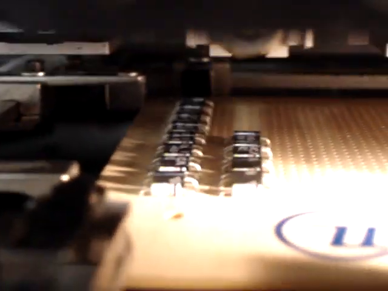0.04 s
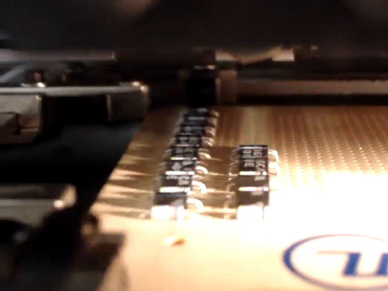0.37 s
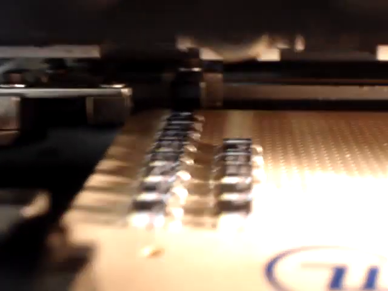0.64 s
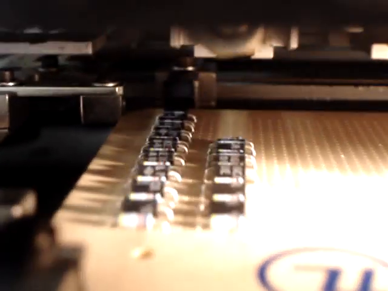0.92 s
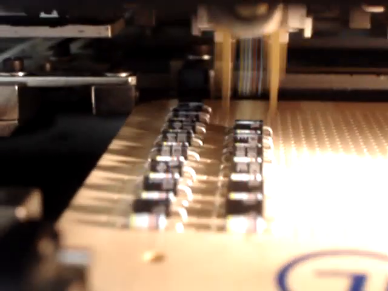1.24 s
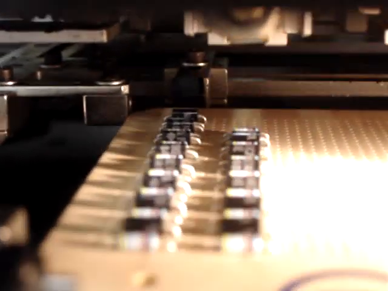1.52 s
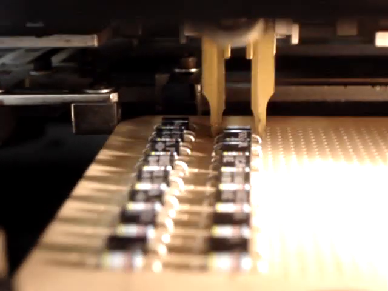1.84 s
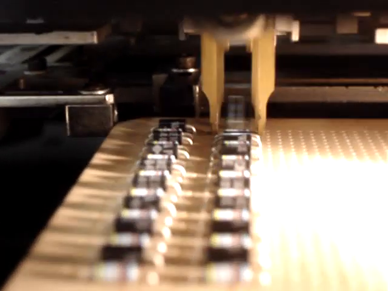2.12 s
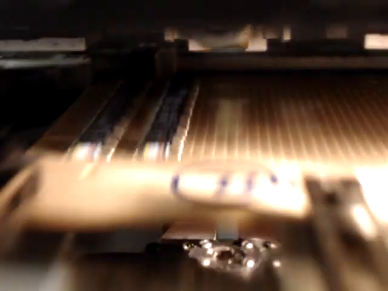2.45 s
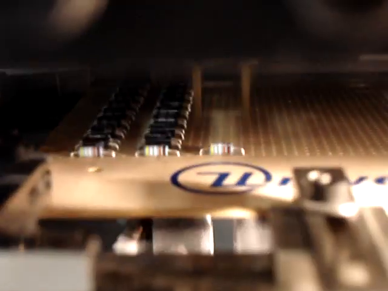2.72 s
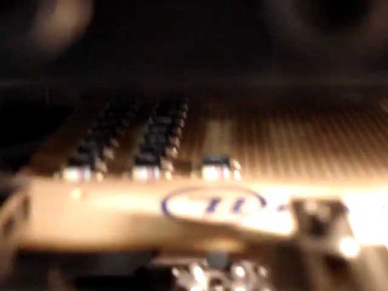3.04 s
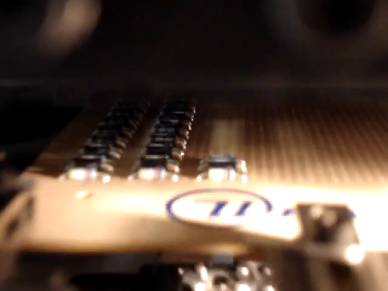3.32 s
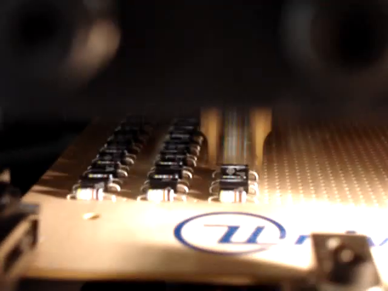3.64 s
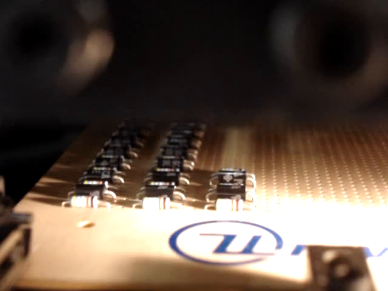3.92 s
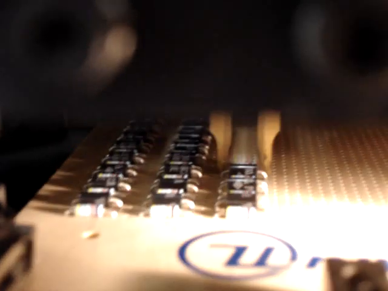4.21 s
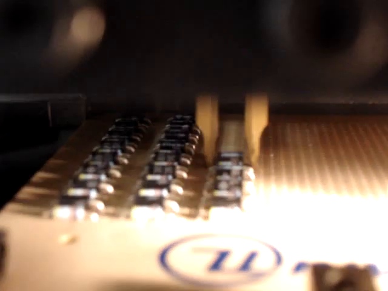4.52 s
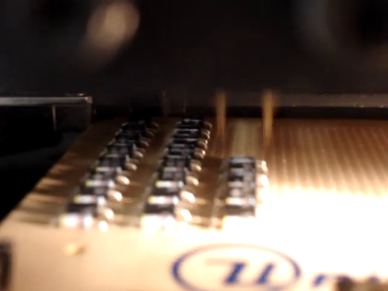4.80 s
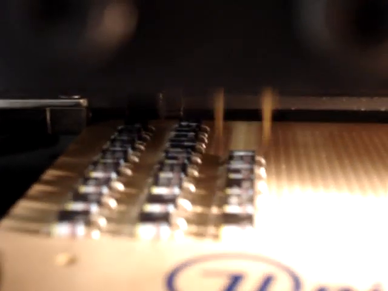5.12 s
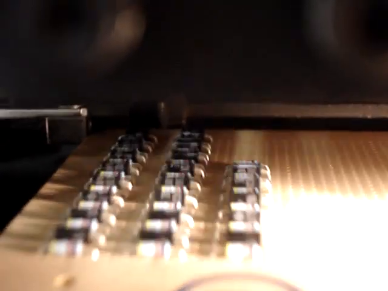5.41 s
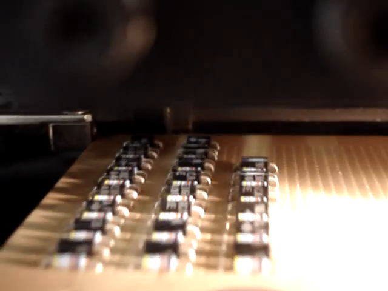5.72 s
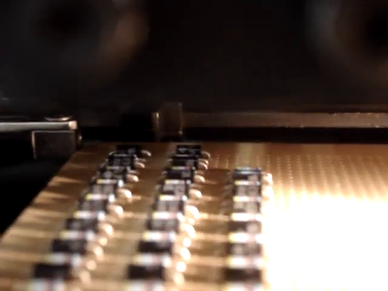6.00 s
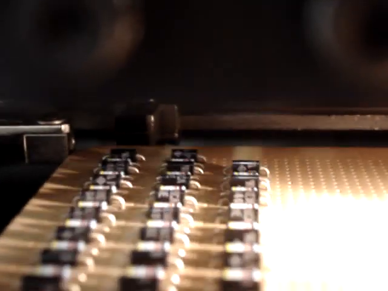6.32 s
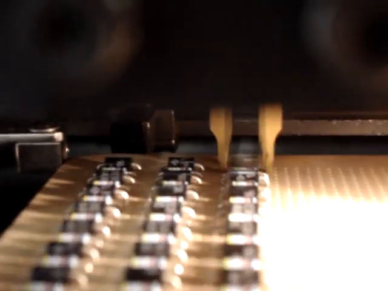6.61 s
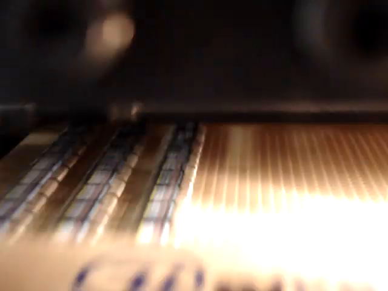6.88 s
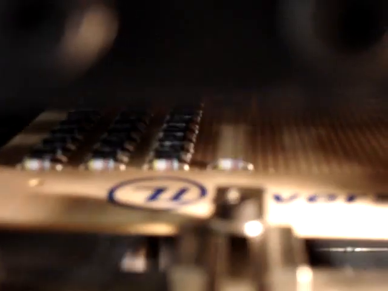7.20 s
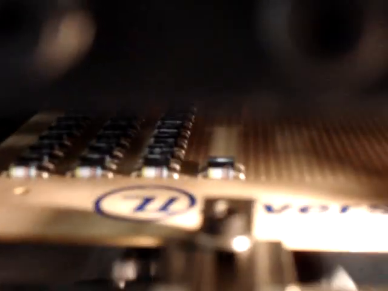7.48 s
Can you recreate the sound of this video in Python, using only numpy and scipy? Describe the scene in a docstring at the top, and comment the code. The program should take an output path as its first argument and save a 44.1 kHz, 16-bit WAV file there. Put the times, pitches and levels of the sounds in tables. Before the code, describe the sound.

Close by, a machine drives small parts into a circuit board at nearly four strokes a second. Each stroke is a sharp steel clack followed by a quick rattle of clicks and a small thud, harder and softer blows mostly alternating. Twice the rhythm breaks for an instant with a knock and a short whirr as the table shifts, then resumes. Motor hum and a workshop rush continue underneath.

```python
"""A component insertion machine, close by, sets rows of sixteen parts into a circuit board, one per cam turn.
Each turn the ram strikes, mostly hard and soft in alternation; the leads scrape home, the part seats,
the clinch anvil thuds, the head rattles back to its stop, the board table steps on and the feed draws
in the next part. The sound shifts along the row. After a row the head idles for one turn while the
table travels. Throughout, loose parts tick, the motor hums and the workshop rushes underneath."""
import sys
import numpy as np
from scipy import signal
from scipy.fft import rfft, irfft, next_fast_len
from scipy.io import wavfile
from scipy.ndimage import uniform_filter1d

SR = 44100
rng = np.random.default_rng(int(sys.argv[2]) if len(sys.argv) > 2 else 0)


def to_wav(sig):
    """Store sig (one row per channel, or 1-D mono) as 16-bit WAV at the path in sys.argv[1].

    Samples outside -1..1 are clipped; the rate is SR.
    """
    pcm = np.clip(np.atleast_2d(sig), -1, 1) * 32767
    pcm = np.round(pcm).astype(np.int16)
    wavfile.write(sys.argv[1], SR, pcm.T)  # frames by channels


N = 332955
TIME = np.arange(N) / SR
TURN_S, PARTS_PER_ROW = .26778, 16
TOP_HZ, TINT_DB = 10100, 3.6


# Ram blows, force relative to an ordinary one: start_s, force_db
RAM_BLOWS = [(-.005, 0), (.2623, -2.7), (.5285, .4), (.7984, -1.1), (1.0648, .7), (1.3373, -1.4),
             (1.6006, 1.5), (1.8744, -.4), (2.1364, 2.8), (2.6522, -1.1), (2.9182, 1.5), (3.1894, -1.8),
             (3.4533, 1.4), (3.7233, -2.1), (3.99, -.6), (4.2597, -3.1), (4.5248, 1.5), (4.7949, -1.1),
             (5.0581, 3.7), (5.3313, -1), (5.5932, 2.5), (5.8667, -1.4), (6.1323, 1.4), (6.4037, .7),
             (6.6702, .4), (7.1836, -.4), (7.452, 1.5)]
# Contacts per blow: delay_s, level_db, t60_s, rise_s
RAM_HITS = [(-.0085, -26.5, .03, .002), (-.002, -14, .017, .001), (.002, -20.5, .016, .0007),
            (.0075, -24, .022, .0007)]
# Ram spectrum: freq_hz, level_db
RAM_EQ = [(100, -10.5), (250, -7.5), (500, -11), (1100, -9.5), (2200, -9), (2700, -0.5), (3600, -4.5),
          (5800, 1), (6600, -5), (8500, -2), (10000, -8)]
# Ram resonances: centre_hz, width_hz, lift_db
RAM_PEAKS = [(302, 35, 4.5), (790, 150, 8), (1800, 530, 7), (3520, 250, 3)]

def ram(force_share):
    """The ram strikes in a quick cluster of steel contacts."""
    start_s, force_db = np.transpose(RAM_BLOWS)
    blows = cam(start_s, force_share * force_db, RAM_HITS, alike=.25, jitter_s=.0003,
                ringing=.6, judder_db=2.5, tint_db=TINT_DB)
    return body(blows, RAM_EQ, RAM_PEAKS)


# Ram mode: delay_s, pitch_hz, level_db, t60_s, rise_s, db_per_force_db
PING_MODE = (-.0018, 4320, -14.5, .022, .0012, 1.7)

def ping(detune):
    """A square blow rings the ram with one clear note, which grows faster than the force."""
    delay, hz, db, t60, rise, growth = PING_MODE
    t, track = TIME[:SR // 10], np.zeros(N)
    for s, force_db in RAM_BLOWS:
        pitch_hz = hz * (1 + detune * rng.uniform(-1, 1))
        add(track, s + delay, ring(t, pitch_hz, db + growth * force_db, t60, rise))
    return track


# Spring contacts: delay_s, level_db, t60_s, rise_s
SPRING_HITS = [(-.004, -32.5, .035, .002), (.001, -26, .028, .0012)]
# Row trend: level_db, slope_db, force_share, first_db, lag_s
SPRING_TREND = (-1.3, 5, -.1, 4.5, .0003)
# Spring spectrum: freq_hz, level_db
SPRING_EQ = [(1000, -44.5), (1550, -21), (1700, 1.5), (1880, 4), (2150, -22), (3500, -29)]

def spring():
    """The blow jars the ram's spring, which sounds in one narrow band."""
    hits = cam(*played(SPRING_TREND), SPRING_HITS, alike=.86, jitter_s=.00037, scatter_db=2)
    return body(hits, SPRING_EQ)


# Lead contacts: delay_s, level_db, t60_s, rise_s
SCRAPE_HITS = [(.0165, -27, .032, .001), (.022, -26.5, .026, .0007), (.0275, -27, .024, .0007)]
# Row trend: level_db, slope_db, force_share, first_db, lag_s
SCRAPE_TREND = (.5, 0, .8, -4, .0003)
# Scrape spectrum, also the linkage's: freq_hz, level_db
SCRAPE_EQ = [(100, -14), (250, -4), (1100, -4), (2700, -3.5), (3600, 0), (5800, -2.5), (6600, -8),
             (8500, -4), (10000, -13)]
# Scrape resonances: centre_hz, width_hz, lift_db
SCRAPE_PEAKS = [(1750, 500, 4), (4900, 300, 2.5)]

def scrape():
    """The leads scrape through the holes."""
    hits = cam(*played(SCRAPE_TREND), SCRAPE_HITS, alike=.36, jitter_s=.0014, scatter_db=1.5,
               ringing=.78, judder_db=3, tint_db=TINT_DB)
    return body(hits, SCRAPE_EQ, SCRAPE_PEAKS)


# Seating contact: delay_s, level_db, t60_s, rise_s
TAP_HITS = [(.0449, -18.4, .021, .0008)]
# Row trend: level_db, slope_db, force_share, first_db, lag_s
TAP_TREND = (-.6, 1.5, .55, 2, .002)
# Tap spectrum, also the empty head's: freq_hz, level_db
TAP_EQ = [(100, -35), (250, -3.5), (500, -9), (1100, -7), (2200, -6), (2700, -1.5), (3600, -1), (5800, 3.5),
          (6600, -1.5), (8500, -2), (10000, -10.5)]
# Tap resonances: centre_hz, width_hz, lift_db
TAP_PEAKS = [(1900, 400, 7), (2600, 600, 5), (4500, 600, 6), (7700, 500, 5)]

def tap():
    """The part seats on the board."""
    hits = cam(*played(TAP_TREND), TAP_HITS, alike=.5, jitter_s=.0003, judder_db=3, tint_db=TINT_DB)
    return body(hits, TAP_EQ, TAP_PEAKS)


# Thud, then bounces: delay_s, level_db, t60_s, rise_s
ANVIL_HITS = [(.064, -20.3, .023, .002), (.077, -27.5, .024, .0015), (.085, -29.5, .016, .001),
              (.096, -29, .016, .003)]
# Row trend: level_db, slope_db, force_share, first_db, lag_s
ANVIL_TREND = (0, .6, .3, 3.5, .0005)
# Anvil spectrum: freq_hz, level_db
ANVIL_EQ = [(100, -17), (200, -22), (400, -4), (750, -8.5), (1100, -17), (1900, -12), (3100, -18),
            (3700, -14), (4800, -18), (6000, -13), (10000, -20)]
# Anvil resonances: centre_hz, width_hz, lift_db
ANVIL_PEAKS = [(260, 54, 9), (470, 64, 5), (790, 70, 6), (932, 90, 14.5)]

def anvil(soft_hz):
    """The clinch under the board folds the leads with a thud; its bounces are duller."""
    s, db = played(ANVIL_TREND)
    thud = cam(s, db, ANVIL_HITS[:1], alike=1, jitter_s=.0001)
    bounces = cam(s, db, ANVIL_HITS[1:], alike=1, jitter_s=.0001)
    dull = signal.sosfilt(signal.butter(1, soft_hz, fs=SR, output="sos"), bounces)
    return body(thud + dull, ANVIL_EQ, ANVIL_PEAKS)


# Catch and bounce contacts: delay_s, level_db, t60_s, rise_s
CATCH_HITS = [(-.009, -29, .025, .0006), (0, -25, .025, .0006)]
RETURN_HITS = [(.119, -25, 0.03, 0.0004), (.1235, -24, 0.021, 0.0004), (.128, -26, 0.03, 0.0008)]
# Row trends: level_db, slope_db, force_share, first_db, lag_s
CATCH_TREND = (2.5, -1.5, .1, -8, -.008)
RETURN_TREND = (.9, 2.2, .35, 1.5, .0003)
# Head spectrum: freq_hz, level_db
RETURN_EQ = [(100, -14.5), (250, -17.5), (500, -9.5), (1100, -7), (2200, -7.5), (2700, -19), (3600, -6),
             (5800, 1), (6600, -5), (8500, -5.5), (10000, -10.5)]
# Head resonances: centre_hz, width_hz, lift_db
RETURN_PEAKS = [(732, 134, 4.1), (2767, 710, 16.8)]

def head_return():
    """The head catches and rattles back."""
    s, db = played(CATCH_TREND)
    catch_delay_s = strokes()[-1]
    catch = cam(s + catch_delay_s, db, CATCH_HITS, alike=.34, jitter_s=.0008, scatter_db=1.5,
                ringing=1, judder_db=3.5, tint_db=TINT_DB)
    bounces = cam(*played(RETURN_TREND), RETURN_HITS, alike=.5, jitter_s=.0009, scatter_db=1.5,
                  ringing=.7, judder_db=3, tint_db=TINT_DB)
    return body(catch + bounces, RETURN_EQ, RETURN_PEAKS)


# Hardest clacks of the returning head: start_s, level_db, pitch_hz
HEAD_CLACKS = [(0.1036, -16.3, 6000), (0.1117, -18.3, 5760), (0.3701, -17.3, 3570), (0.3782, -18.5, 3500),
               (0.6448, -16.8, 6180), (0.9036, -17.4, 3700), (0.9147, -16.1, 5080), (1.1782, -16.7, 5920),
               (1.1838, -17.6, 2700), (1.4453, -16.3, 5960), (1.452, -17.4, 4340), (1.704, -16.6, 5480),
               (1.7192, -16.8, 4240), (1.9791, -16.7, 6260), (1.989, -19.6, 5100), (2.2452, -17.5, 5400),
               (2.256, -16.0, 5180), (2.771, -14.8, 4350), (3.0286, -15.8, 6200), (3.0373, -19.1, 4830),
               (3.2957, -14.7, 5730), (3.3057, -17.5, 2910), (3.5627, -16.7, 5490), (3.8289, -14.9, 5770),
               (3.8388, -18.4, 4330), (4.096, -14.3, 5720), (4.3713, -16.2, 5970), (4.3763, -18.0, 5700),
               (4.6373, -17.7, 5440), (4.8965, -17.9, 3740), (4.9108, -17.5, 5880), (5.1714, -15.5, 5920),
               (5.178, -17.5, 3310), (5.4377, -15.3, 6130), (5.4457, -15.6, 4360), (5.7049, -17.1, 5040),
               (5.7124, -17.4, 4380), (5.9708, -16.2, 5660), (5.981, -16.4, 4410), (6.2381, -17.8, 5850),
               (6.2513, -18.4, 4410), (6.5047, -17.2, 3730), (6.5196, -17.5, 4450), (6.7803, -17.9, 6070),
               (6.7905, -18.4, 5190), (7.3015, -14.8, 4280)]

def clacks(crack_db, crack_t60_s, ring_db, ring_t60_s):
    """Steel meets steel as the head swings back: a sharp crack and a brief ring."""
    cracks, rings, t = np.zeros(N), np.zeros(N), TIME[:SR // 10]
    for s, db, hz in HEAD_CLACKS:
        add(cracks, s, amp(db + crack_db) * tinted(chatter(crack_t60_s), TINT_DB))
        add(rings, s, ring(t, hz, db + ring_db, ring_t60_s, rise_s=.0006))
    return body(cracks, RETURN_EQ, RETURN_PEAKS) + rings


# Tick contacts: delay_s, level_db, t60_s, rise_s
TICK_HITS = [(.131, -33, .04, .002), (.1464, -24, .022, .0008)]
# Row trend: level_db, slope_db, force_share, first_db, lag_s
TICK_TREND = (-.3, 2.4, -.5, 3, .001)
# Tick spectrum: freq_hz, level_db
TICK_EQ = [(100, -11), (250, -8), (1100, 1), (2700, -2), (3600, -1), (5800, -8), (10000, -12)]
# Tick resonances: centre_hz, width_hz, lift_db
TICK_PEAKS = [(4400, 1400, 12), (6700, 420, 12)]

def head_tick():
    """The head ticks just before its stop."""
    hits = cam(*played(TICK_TREND), TICK_HITS, alike=.45, jitter_s=.0006, scatter_db=1.2,
               tint_db=TINT_DB)
    return body(hits, TICK_EQ, TICK_PEAKS)


# Stop contacts: delay_s, level_db, t60_s, rise_s
STOP_HITS = [(.154, -21.5, .018, .0012), (.1586, -13.6, .019, .0011)]
# Row trend: level_db, slope_db, force_share, first_db, lag_s
STOP_TREND = (-.1, 2.4, .5, 1, .001)
# Stop spectrum: freq_hz, level_db
STOP_EQ = [(100, -33), (250, 0), (500, -22), (1000, -3), (1400, -11), (2200, -14), (2700, 3.5),
           (3600, -1.5), (5800, 6), (6600, 2), (8500, 2.5), (10000, -4)]
# Stop resonances: centre_hz, width_hz, lift_db
STOP_PEAKS = [(1690, 153, 4), (1800, 640, 26.3), (4350, 590, 10)]

def head_stop():
    """The head hits its sprung stop."""
    hits = cam(*played(STOP_TREND), STOP_HITS, alike=.6, jitter_s=.0005, scatter_db=.8)
    return body(hits, STOP_EQ, STOP_PEAKS)


# Feed contact: delay_s, level_db, t60_s, rise_s
FEED_HITS = [(0.234, -33, 0.036, 0.003)]
# Row trend: level_db, slope_db, force_share, first_db, lag_s
FEED_TREND = (-1.3, -2.5, .5, -3, 0)
# Feed spectrum: freq_hz, level_db
FEED_EQ = [(100, 8.5), (450, -0.5), (1200, -40), (2300, -36.5), (3700, -1), (6500, 6), (9000, 1),
           (10000, -29)]

def feed():
    """The feed draws in the next part."""
    hits = cam(*played(FEED_TREND), FEED_HITS, alike=.15, jitter_s=.002, scatter_db=3.5,
               judder_db=3, tint_db=TINT_DB)
    return body(hits, FEED_EQ)


# Table step contacts: delay_s, level_db, t60_s, rise_s
STEP_HITS = [(.184, -26, .04, .003), (.196, -31, .055, .003), (.203, -30, .05, .003),
             (.218, -34, .035, .003)]
# Table spectrum: freq_hz, level_db
STEP_EQ = [(100, -16), (200, -20.5), (380, -3), (700, -7.5), (1200, -27), (2200, -25), (4000, -21),
           (10000, -31)]
# Table resonances: centre_hz, width_hz, lift_db
STEP_PEAKS = [(261, 44, 8), (440, 14, 3.4), (477, 12, 4), (945, 86, 14), (1553, 48, 9)]
# Table modes: pitch_hz, mid_row_db, t60_s, slope_db
STEP_MODES = [(376, -45, .2, 23), (435, -44, .22, 4), (484, -43, .22, -13), (935, -40.5, .085, -20)]
# Kicks to the modes, anvil then step: delay_s, level_db, rise_s
MODE_KICKS = [(.066, -1, .002), (.186, 0.5, .012)]

def table_step(scatter_db, detune, slope_db):
    """The table shudders one step on; its place along the row decides which modes ring most."""
    s, places = strokes()[:2]
    hits = cam(s, slope_db * places, STEP_HITS, alike=.7, jitter_s=.0005, scatter_db=.8)
    track = body(hits, STEP_EQ, STEP_PEAKS)
    t = TIME[:SR // 5]
    hz, db, t60, mode_slope_db = np.transpose(STEP_MODES)[:, :, None]
    for start, place in zip(s, places):
        for delay, kick_db, rise in MODE_KICKS:
            strength, stray = rng.uniform(-1, 1, (2, *hz.shape))
            mode_db = db + kick_db + mode_slope_db * place + scatter_db * strength
            modes = ring(t, hz * (1 + detune * stray), mode_db, t60, rise)
            add(track, start + delay, modes.sum(axis=0))
    return track


# Idle turns: start_s
IDLE_STARTS = [2.4255, 6.952]
# Clutch knocks and empty-head clicks: delay_s, level_db, t60_s, rise_s
CLUTCH_HITS = [(-.0045, -35, .08, .0004), (0.0002, -22, .052, .0006), (.007, -20, .015, .0004),
               (.226, -18, .014, .0004)]
IDLE_HITS = [(-.053, -34, .06, .002), (.0853, -24, .03, .0004), (.0952, -14.5, .019, .0004),
             (.1065, -26, .035, .0004), (.1163, -26, .017, .0004), (.208, -29, .035, .0008)]
# Clutch spectrum: freq_hz, level_db
CLUTCH_EQ = [(100, -15.5), (240, -6.5), (500, -2.5), (1400, -5), (2200, -7.5), (4000, -5.5), (6000, -5),
             (10000, -12.5)]
# Empty-head resonance: centre_hz, width_hz, lift_db
IDLE_PEAKS = [(3750, 400, 9)]

def idle_head():
    """The clutch drops out with a knock, the empty head clicks and the clutch takes hold again."""
    even_db = np.zeros(len(IDLE_STARTS))
    knocks = cam(IDLE_STARTS, even_db, CLUTCH_HITS, alike=.4, jitter_s=.0003)
    clicks = cam(IDLE_STARTS, even_db, IDLE_HITS, alike=.4, jitter_s=.0003)
    return body(knocks, CLUTCH_EQ) + body(clicks, TAP_EQ, IDLE_PEAKS)


# Drive whine, level relative to the whirr: start_hz, end_hz, level_db
DRIVE_WHINE = (950, 1750, -15)
# Carriage spectrum: freq_hz, level_db
TRAVEL_EQ = [(120, -26.5), (240, 2), (700, 0), (1250, -.5), (1700, -4), (2300, -11.5), (4000, -11),
             (10000, -22)]
# Carriage resonances: centre_hz, width_hz, lift_db
TRAVEL_PEAKS = [(710, 60, 9), (1135, 70, 8), (1540, 150, 6.5)]

def travel(level_db, waver_hz, lead_s=.1, attack_s=.05, hold_s=.21, release_s=.06):
    """The table whirrs to the next row; its drive whines upward through the carriage's resonances."""
    corners_s = np.cumsum([-lead_s, attack_s, hold_s, release_s])
    start_hz, end_hz, whine_db = DRIVE_WHINE
    waver = waver_hz * wobble(N, smooth=200)
    drive = np.zeros(N)
    for s in IDLE_STARTS:
        hz = np.interp(TIME - s, corners_s[[0, -1]], [start_hz, end_hz]) + waver
        whine = amp(whine_db) * np.sin(2 * np.pi * np.cumsum(hz) / SR)
        drive += np.interp(TIME - s, corners_s, [0, 1, 1, 0]) * (rng.standard_normal(N) + whine)
    return amp(level_db) * body(drive, TRAVEL_EQ, TRAVEL_PEAKS)


def boom(pitch_hz):
    """The frame's low mode booms at the clutch's knock and again as the table brakes."""
    t, track = TIME[:SR // 3], np.zeros(N)
    for s in IDLE_STARTS:
        add(track, s, ring(t, pitch_hz, level_db=-34, t60_s=.12, rise_s=.003))
        add(track, s + .14, ring(t, pitch_hz, level_db=-35, t60_s=.25, rise_s=.025))
    return track


# Squeaks of the parts tape: centre_s, level_db, pitch_hz
TAPE_SQUEAKS = [(.771, -39, 4970), (5.303, -32, 5060), (6.371, -38, 5060), (6.915, -37, 5180)]

def squeaks(width_s, waver_hz):
    """The tape sticks and slips in its guide: a short wavering tone."""
    t, track = TIME[:SR // 10], np.zeros(N)
    swell = np.exp(-((t - t.mean()) / width_s) ** 2)
    for s, db, hz in TAPE_SQUEAKS:
        pitch_hz = hz + waver_hz * wobble(len(t), smooth=60)
        add(track, s - t.mean(), amp(db) * swell * np.sin(2 * np.pi * np.cumsum(pitch_hz) / SR))
    return track


# Link contacts: delay_s, level_db, t60_s, rise_s
LINK_HITS = [(.074, -38.5, .06, .002), (.137, -39, .05, .002), (.195, -38.5, .05, .002),
             (.222, -40, .035, .002)]

def linkage():
    """Slack links chink between the main blows."""
    s = strokes()[0]
    hits = cam(s, np.zeros_like(s), LINK_HITS, alike=.3, jitter_s=.002, scatter_db=2.5,
               ringing=1.5, judder_db=3, tint_db=TINT_DB)
    return body(hits, SCRAPE_EQ)


# Loose-part spectrum: freq_hz, level_db
LOOSE_EQ = [(200, -6), (1500, -6.5), (2400, 16), (3800, 21), (6000, 6), (8500, -31), (10000, -33.5)]

def loose_parts(level_db, scatter_db, t60_s, count=300):
    """Taped parts and loose guides tick faintly all the time."""
    track = np.zeros(N)
    for when, strength in rng.random((count, 2)):
        tick = tinted(chatter(t60_s), TINT_DB)
        add(track, when * N / SR, amp(level_db + scatter_db * strength ** 2) * tick)
    return body(track, LOOSE_EQ)


# Workshop spectrum: freq_hz, level_db
SHOP_EQ = [(15, -4), (29, 5), (48, -10), (70, -.5), (130, -7.5), (250, 3.5), (500, 7), (900, 4),
           (1400, 0.5), (2400, -6.5), (4000, -23), (6000, -37.5), (10000, -89.5)]
# Hum resonances: centre_hz, width_hz, lift_db
SHOP_PEAKS = [(163.7, 15, 8), (243.4, 31, 8.9), (386, 40, 4.1)]

def workshop(level_db):
    """Motor and fans: a steady rush with humming resonances."""
    return amp(level_db) * body(rng.standard_normal(N), SHOP_EQ, SHOP_PEAKS, size=16384)


# Rows of parts: start_s, catch_delay_s
PART_ROWS = [(-1.8848, .117), (2.6461, .112), (7.178, .112)]

def strokes():
    """Working turns: start_s, place in the row (-1/2 to 1/2), is_first, catch_delay_s."""
    turns = [(start + k * TURN_S, k / (PARTS_PER_ROW - 1) - .5, k == 0, catch_delay_s)
             for start, catch_delay_s in PART_ROWS for k in range(PARTS_PER_ROW)]
    return np.transpose([turn for turn in turns if -TURN_S < turn[0] < N / SR])


def played(trend):
    """A part's start_s and level_db on each turn; slope and lag build up across a row."""
    level_db, slope_db, force_share, first_db, lag_s = trend
    s, place, is_first, _ = strokes()
    force_db = np.interp(s, *np.transpose(RAM_BLOWS))
    return s + lag_s * place, level_db + slope_db * place + force_share * force_db + first_db * is_first


def cam(starts_s, turns_db, hits, alike, jitter_s, scatter_db=0, ringing=0, judder_db=0, tint_db=0):
    """A part's contacts on every turn; the share `alike` of each repeats, the rest is new."""
    track = np.zeros(N)
    for delay, db, t60, rise in hits:
        own = chatter(t60, rise)
        for s, turn_db in zip(starts_s, turns_db):
            sound = np.sqrt(alike) * own + np.sqrt(1 - alike) * chatter(t60, rise)
            sound *= judder(judder_db)
            if tint_db:
                sound = tinted(sound, tint_db)
            sound *= np.linalg.norm(own) / np.linalg.norm(sound)  # juddering adds no energy
            if ringing:
                sound += ringing * steel()
            onset_s = s + delay + jitter_s * rng.normal()
            add(track, onset_s, amp(db + turn_db + scatter_db * rng.normal()) * sound)
    return track


# Modes of the steel head: pitch_hz, level_db, t60_s
HEAD_MODES = [(2850, -5, 0.025), (3520, 3, 0.045), (3910, 0, 0.045), (4347, 0, 0.044), (4780, -8.5, 0.017),
              (5000, 1, 0.016), (5820, 0, 0.025), (6100, 0.5, 0.02), (7160, -4, .025), (8300, -4.5, .02)]

def steel(level_db=-19.5, scatter_db=7, detune=.014, size=4096):
    """The head's own modes; each blow lands a little differently and favours other ones."""
    t = TIME[:size]
    hz, db, t60 = np.transpose(HEAD_MODES)[:, :, None]
    strength, stray, phase = rng.uniform(-1, 1, (3, len(HEAD_MODES), 1))
    waves = np.sin(2 * np.pi * hz * (1 + detune * stray) * t + np.pi * phase)
    return np.sum(amp(level_db + db + scatter_db * strength - 60 * t / t60) * waves, axis=0)


def chatter(t60_s, rise_s=.00035, size=4096):
    """The crowded, fast-dying modes of one steel contact, evenly strong at all frequencies."""
    t = TIME[:size]
    fade = amp(-60 * t / t60_s) * (1 - np.exp(-t / rise_s))
    spectrum = rfft(rng.standard_normal(size) * fade, 2 * size)
    even = irfft(spectrum / (np.abs(spectrum) + 1e-12))[:size]
    even *= np.exp(-(t / t60_s) ** 2)  # no mode outlives the contact
    return even * np.linalg.norm(fade) / np.linalg.norm(even)


def judder(depth_db, size=4096, count=90):
    """An uneven gain: the surfaces touch and part many times within one contact."""
    position = np.linspace(0, count - 1, size)
    return amp(depth_db * np.interp(position, np.arange(count), rng.standard_normal(count)))


def tinted(sound, depth_db, count=15):
    """Each blow lands on a slightly different spot and favours other treble resonances."""
    knots_hz = np.linspace(2000, TOP_HZ, count)
    levels_db = depth_db * rng.standard_normal(count) * (knots_hz > knots_hz[0])
    return body(sound, np.column_stack([knots_hz, levels_db]), size=512)[:len(sound)]


def body(x, eq, peaks=(), size=4096):
    """A causal body of unit power gain: a broad spectrum lifted by resonances."""
    hz = np.fft.rfftfreq(size, 1 / SR)
    knots_hz, levels_db = np.transpose(eq)
    db = np.interp(np.log(hz + 1), np.log(knots_hz), levels_db)
    db += sum(lift / (1 + (2 * (hz - centre) / width) ** 2) for centre, width, lift in peaks)
    gain = amp(db) / np.sqrt(np.mean(amp(db) ** 2 * (hz < TOP_HZ)))
    cepstrum = irfft(np.log(gain))
    cepstrum[1:size // 2] *= 2  # fold to minimum phase
    cepstrum[size // 2 + 1:] = 0
    return signal.oaconvolve(x, irfft(np.exp(rfft(cepstrum))))[:N]


def ring(t, pitch_hz, level_db, t60_s, rise_s):
    """One struck mode: a sine that rises and dies away."""
    envelope = amp(level_db - 60 * t / t60_s) * (1 - np.exp(-t / rise_s))
    return envelope * np.sin(2 * np.pi * pitch_hz * t)


def wobble(size, smooth):
    """Unit-RMS noise, averaged over `smooth` samples."""
    x = uniform_filter1d(rng.standard_normal(size), smooth)
    return x / np.sqrt(np.mean(x ** 2) + 1e-20)


def add(track, start_s, sound):
    """Mix a sound into the track."""
    start = round(start_s * SR)
    lo, hi = max(start, 0), min(start + len(sound), N)
    if hi > lo:
        track[lo:hi] += sound[lo - start:hi - start]


def amp(db):
    return 10 ** (np.asarray(db) / 20)


def scene():
    """The head, the table under it and the workshop around them."""
    head = loose_parts(level_db=-52, scatter_db=10.5, t60_s=.05)
    head += ram(force_share=.7) + spring() + scrape() + tap() + ping(detune=.018)
    head += head_return() + clacks(crack_db=-2.3, crack_t60_s=.016, ring_db=-2, ring_t60_s=.02)
    head += head_tick() + head_stop() + feed() + squeaks(width_s=.008, waver_hz=90)
    head += linkage() + idle_head()
    bed = anvil(soft_hz=2000) + table_step(scatter_db=2, detune=.014, slope_db=1.5)
    bed += travel(level_db=-42.5, waver_hz=35) + boom(pitch_hz=245)
    bass_cut = signal.butter(3, 115, "highpass", fs=SR, output="sos")  # small parts radiate little bass
    return (signal.sosfilt(bass_cut, head + bed) + workshop(level_db=-44))[None]


def record(dry):
    """The tallest peaks are rounded off and everything above TOP_HZ is cut."""
    rounded = dry / (1 + (dry / .42) ** 4) ** (1 / 4)
    size = next_fast_len(N + SR // 4)
    in_band = np.fft.rfftfreq(size, 1 / SR) < TOP_HZ
    return irfft(rfft(rounded, size) * in_band, size)[:, :N]


dry = scene()
out = record(dry)
to_wav(out)
```